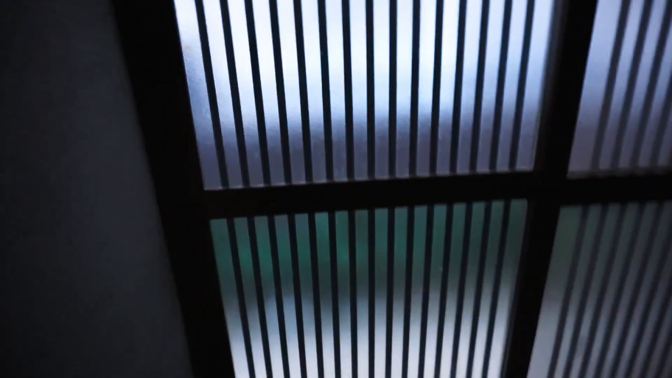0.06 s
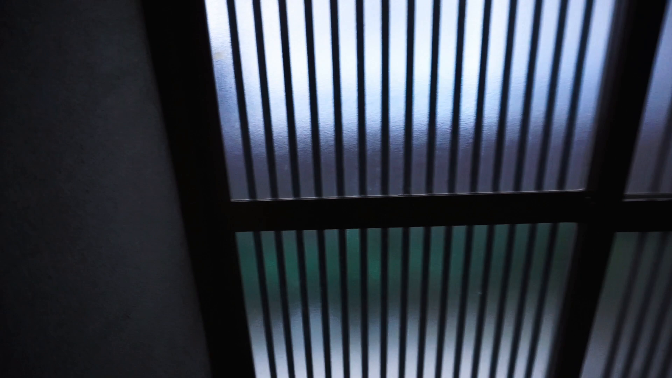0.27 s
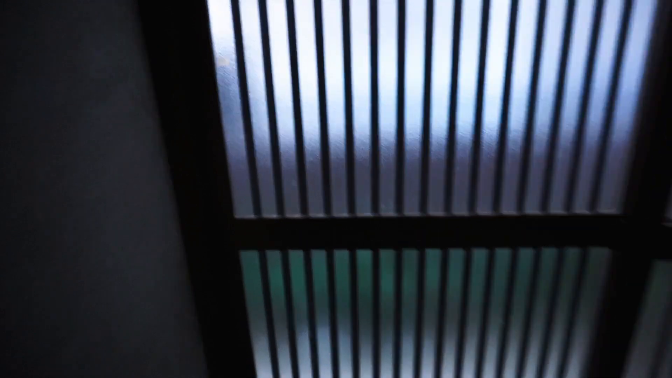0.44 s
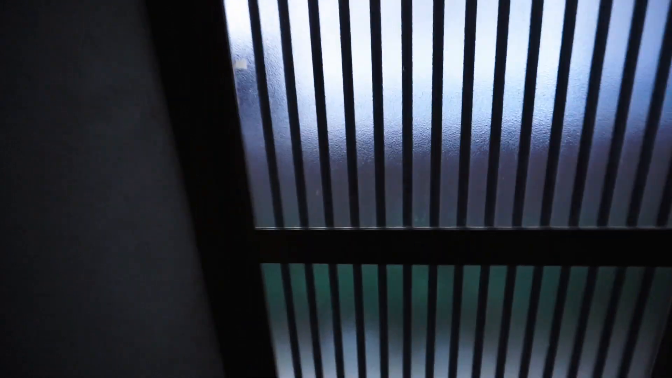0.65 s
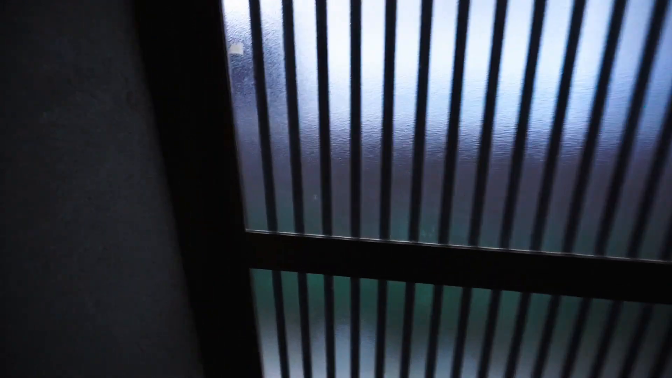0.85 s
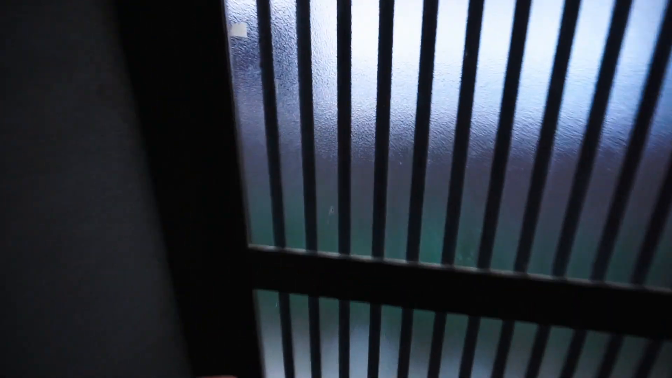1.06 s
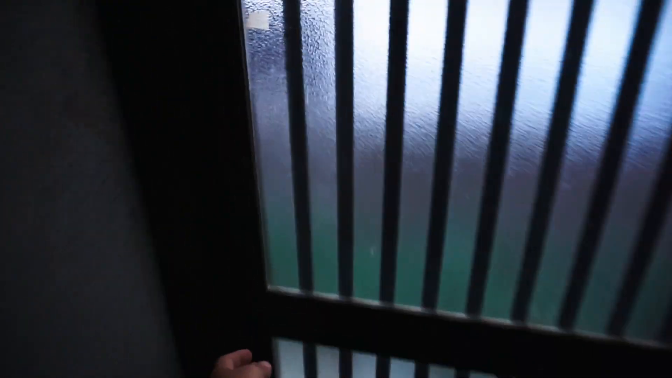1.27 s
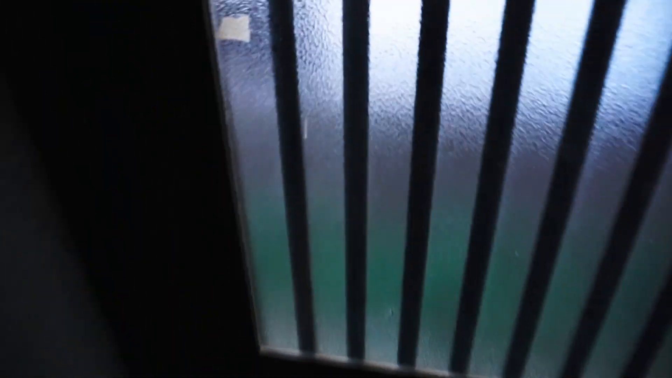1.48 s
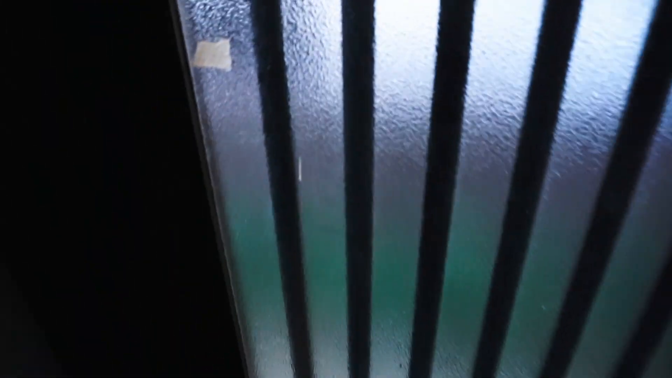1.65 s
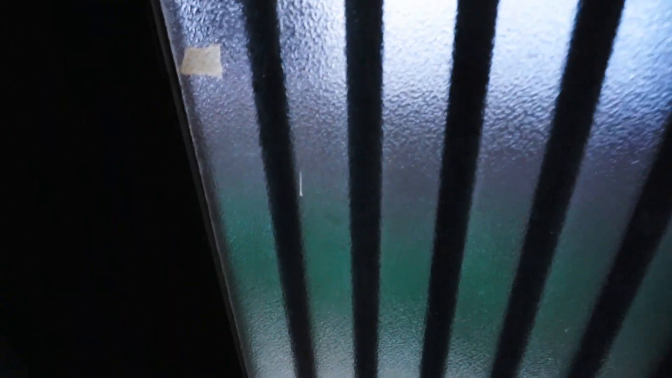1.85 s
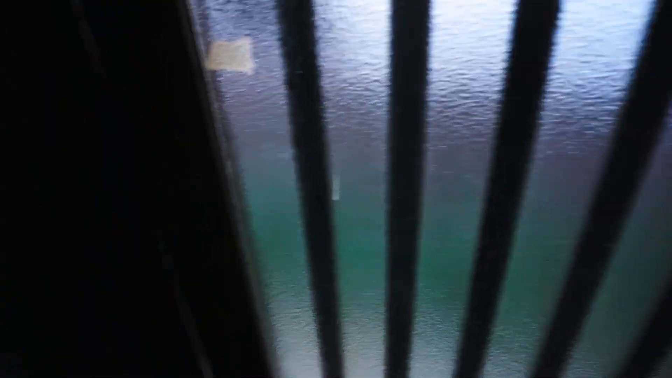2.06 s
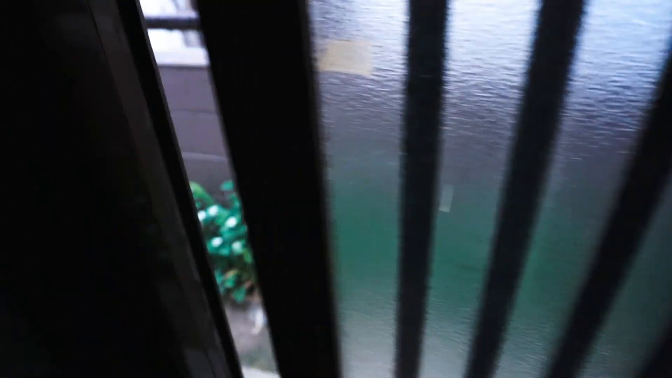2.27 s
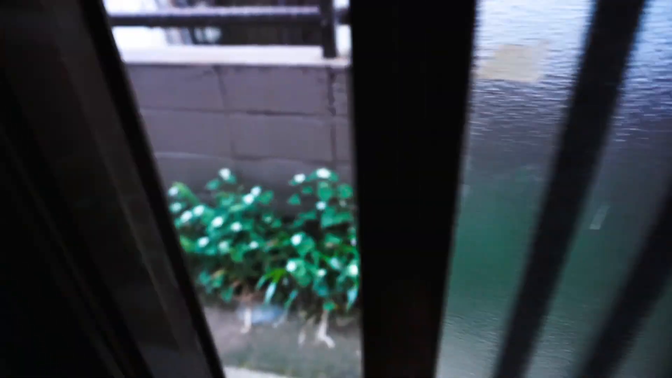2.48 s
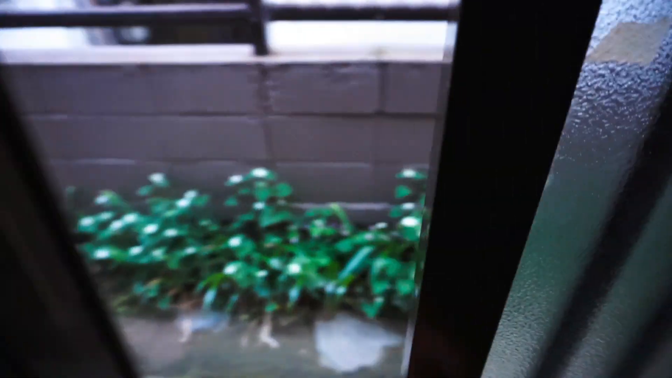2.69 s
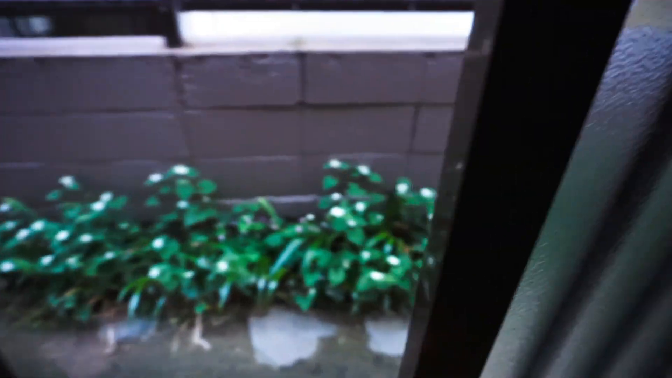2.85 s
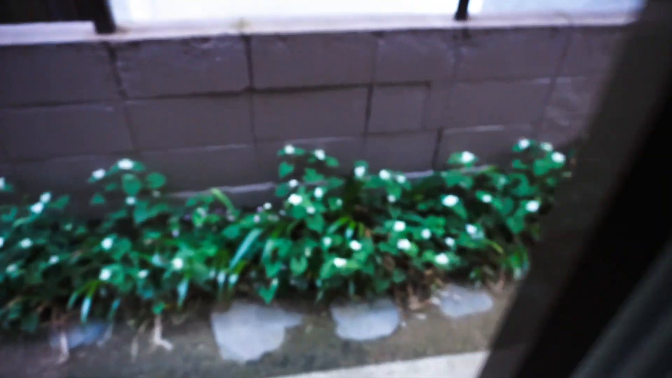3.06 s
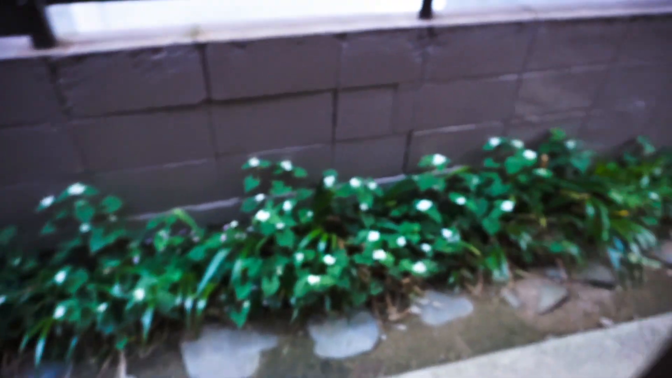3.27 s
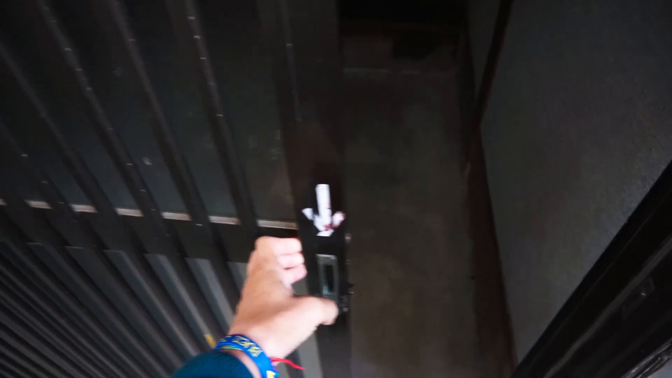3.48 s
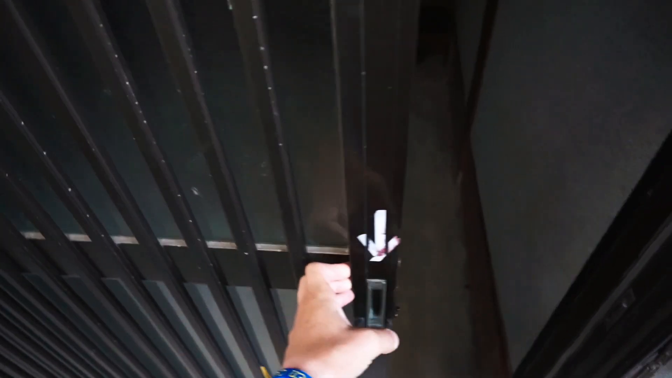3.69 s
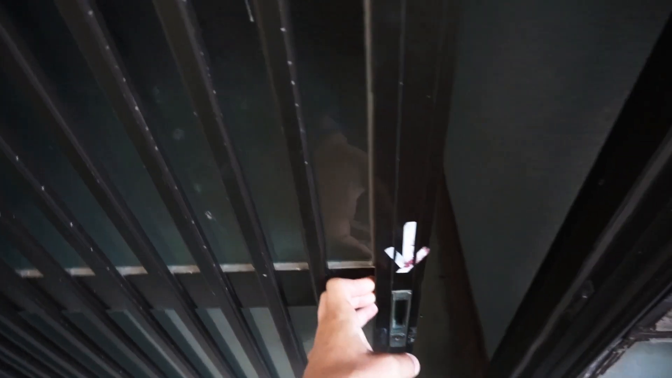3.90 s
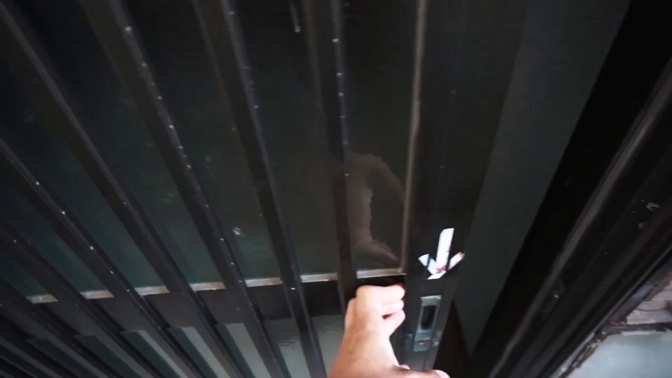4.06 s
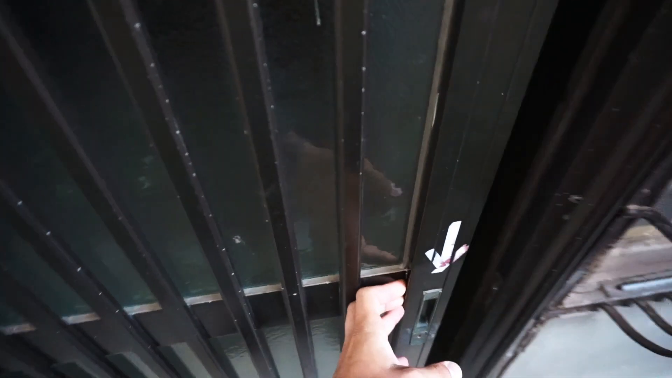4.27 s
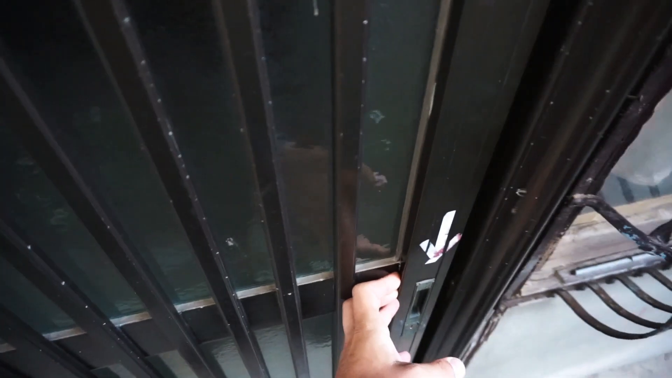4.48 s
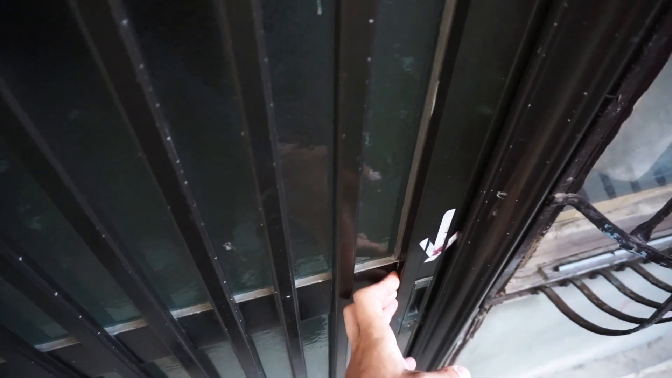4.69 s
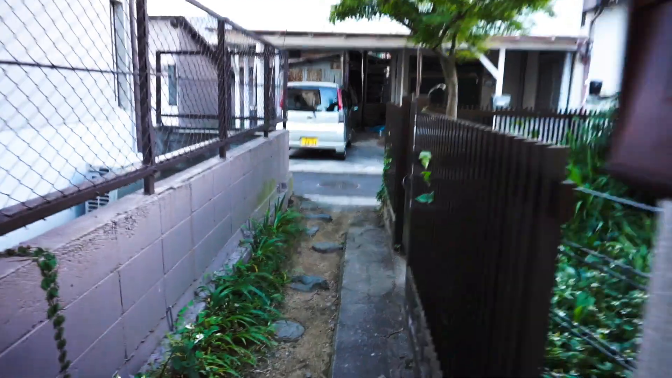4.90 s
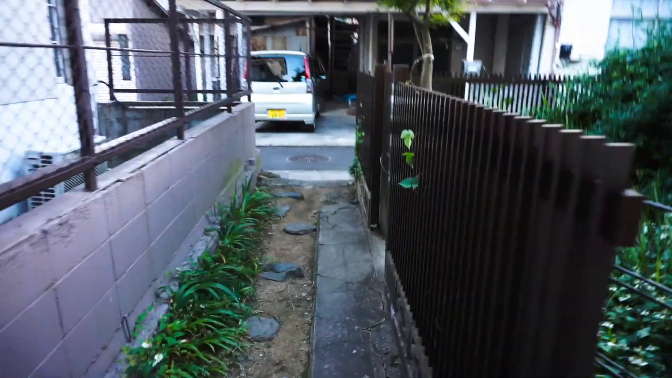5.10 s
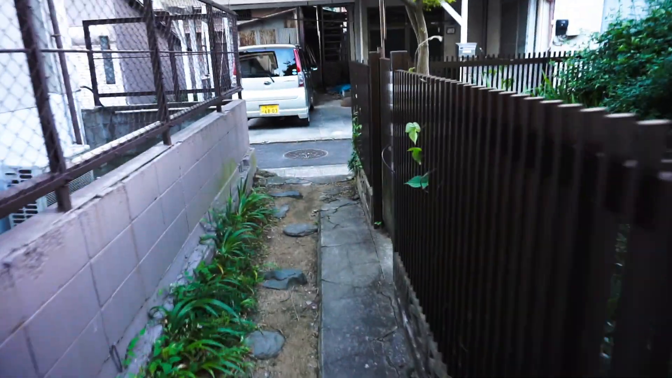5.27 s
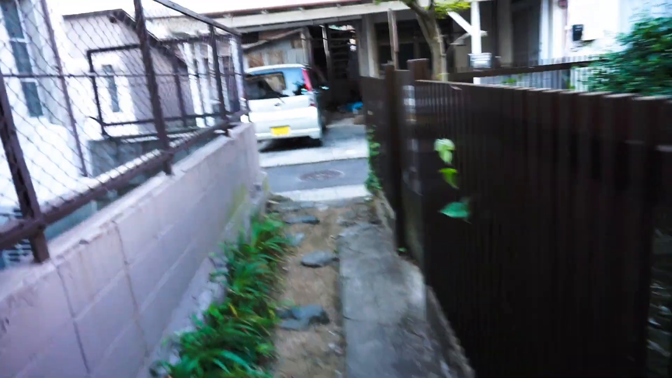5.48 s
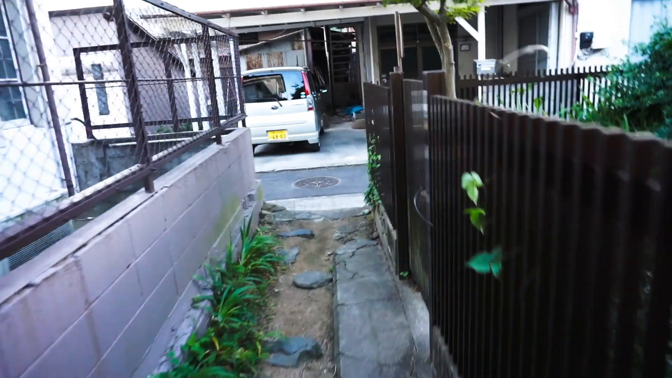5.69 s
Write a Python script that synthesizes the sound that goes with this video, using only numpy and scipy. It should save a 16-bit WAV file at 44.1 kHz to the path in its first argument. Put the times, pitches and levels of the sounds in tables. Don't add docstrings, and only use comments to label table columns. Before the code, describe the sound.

In a quiet entrance, small clicks and soft thumps lead to a rattling sliding door rolling open, then closing more drily with a bang at the post.

```python
import sys
import numpy as np
from scipy import signal
from scipy.fft import rfft, irfft, next_fast_len
from scipy.io import wavfile
from scipy.ndimage import uniform_filter1d, map_coordinates

SR = 44100
rng = np.random.default_rng(int(sys.argv[2]) if len(sys.argv) > 2 else 0)


def voltage_ratio(decibels):
    exponent = np.asarray(decibels, float) / 20
    return 10 ** exponent


def put_to_file(sound):
    columns = np.atleast_2d(sound).T
    safe = np.clip(columns, -1, 1)
    whole_steps = np.round(safe * 32767)
    wavfile.write(sys.argv[1], SR, whole_steps.astype(np.int16))


N = 253134
OUTSIDE_S = 3.46


def unit(x):
    return x / np.sqrt(np.mean(x ** 2) + 1e-20)


def along(points, hz):
    f, v = np.transpose(points)
    return np.interp(np.log(hz + 1), np.log(f + 1), v)


def colour(points):
    return lambda hz: voltage_ratio(along(points, hz))


def wobble(rate_hz):
    knots = rng.standard_normal(int(N * rate_hz / SR) + 4)
    return map_coordinates(knots, [np.arange(N) * rate_hz / SR])


def modes(table, hz, gains=None):
    centre, width, db = np.transpose(table)[:, :, None]
    gain = voltage_ratio(db) * (-1.) ** np.arange(len(table))[:, None]
    if gains is not None:
        gain = gain * gains[:, None]
    return np.sum(gain * 1j * hz * width / (centre ** 2 - hz ** 2 + 1j * hz * width), axis=0)


# f/Hz, likeness (0..1)
LIKENESS = [(100, 1), (350, 0.99), (700, 0.84), (1400, 0.39), (2800, 0.096), (5000, 0.0093), (10000, 0.023),
            (14000, 0.085)]


def stereo(pair, response, direct=0, lag_s=0):
    n = pair.shape[1]
    m = next_fast_len(n + 4096)
    hz = np.fft.rfftfreq(m, 1 / SR)
    likeness = direct + (1 - direct) * along(LIKENESS, hz)
    turn = np.arccos(np.clip(likeness, -1, 1)) / 2
    mid, side = rfft(pair, m) * response(hz) * [np.cos(turn), np.sin(turn)]
    shift = np.exp(1j * np.pi * hz * lag_s)
    return irfft(np.array([(mid + side) / shift, (mid - side) * shift]), m)[:, :n]


def rush(response, grain_db, patchy_db=0):
    noise = voltage_ratio(grain_db * (wobble(35) + 0.31 * wobble(220))) * rng.standard_normal((2, N))
    if patchy_db:
        z = signal.stft(noise, nperseg=256)[2]
        field = uniform_filter1d(rng.standard_normal(z.shape[1:]), size=3, axis=0)
        field = uniform_filter1d(field, size=6, axis=1)
        noise = signal.istft(z * voltage_ratio(patchy_db * unit(field)), nperseg=256)[1][:, :N]
    return unit(stereo(noise, response))


def burst(t60_s, rise_s, crack=0):
    t = np.arange(SR // 6) / SR
    chatter = voltage_ratio(-60 * t / t60_s) * (1 - np.exp(-t / rise_s))
    contact = voltage_ratio(-60 * t / 0.02) * (1 - np.exp(-t / .0001))
    return rng.standard_normal((2, len(t))) * (chatter + crack * contact)


def favour(table, ring_hz, lift_db, reach_oct, scatter_db):
    octaves = np.log2(np.array(table)[:, 0] / ring_hz)
    lift = lift_db * np.exp(-(octaves / reach_oct) ** 2)
    return voltage_ratio(lift + scatter_db * rng.standard_normal(len(table)))


def blow(pair, response):
    return stereo(pair, response, direct=0.89, lag_s=.00007 * rng.standard_normal())


def add(track, s, sound, peak_db, pan_db):
    i = round((s - .001) * SR)
    sound = sound[:, :track.shape[1] - i] / np.abs(sound.mean(axis=0)).max()
    track[:, i:i + sound.shape[1]] += sound * voltage_ratio([[peak_db + pan_db / 2], [peak_db - pan_db / 2]])


# f/Hz, level/dB per Hz
AIR = [(24, -46), (40, -47), (85, -43), (147, -7.5), (180, -15), (918, -6), (1090, -3.5), (1590, -2),
       (1760, -5), (2050, -6), (7360, -13.5), (12800, -11), (16000, -15.5)]


def air():
    return voltage_ratio(-55) * rush(colour(AIR), grain_db=0)


# f/Hz, t60/s
HALL = [(200, 0.38), (2000, 0.24), (10000, 0.18)]


def hall(x):
    hz, t, z = signal.stft(rng.standard_normal((2, SR // 3)), SR, nperseg=256)
    decay = voltage_ratio(-60 * t / along(HALL, hz)[:, None])
    tail = signal.istft(z * decay, SR, nperseg=256)[1]
    return signal.fftconvolve(x, tail / np.linalg.norm(tail[0]), axes=1)[:, :N]


def strokes(peak_s, rise_s, fall_s, db):
    power = np.zeros(N)
    for s, up, down, level in zip(peak_s, rise_s, fall_s, db):
        span = slice(max(int((s - up) * SR), 0), int((s + 5 * down) * SR))
        t = (np.arange(N) / SR)[span] - s
        swell = np.clip(1 + t / up, 0, 1) ** 1.3
        fade = voltage_ratio(level - 17 * np.clip(t / down, 0, None))
        power[span] += (fade * swell) ** 2
    return np.sqrt(power)


# peak t/s, rise/s, fall/s, level/dB, brightness/dB
RUBS = [(0.002, 0.0028, 0.04, -38.5, 3), (0.06, 0.049, 0.0094, -38.5, 1), (.46, 0.0057, 0.12, -48.5, 5.5),
        (.62, 0.049, 0.1, -44.5, 3.5), (.706, 0.0081, 0.079, -48, 4), (.83, 0.039, 0.078, -45, -2.5),
        (1.182, 0.023, 0.049, -53.5, 5.5), (1.227, 0.045, 0.13, -49, 0), (1.322, 0.02, 0.15, -44.5, -2),
        (1.41, 0.15, 0.11, -46, 5), (1.586, 0.0035, 0.095, -24, -3), (1.666, 0.09, 0.1, -29.5, 0),
        (1.744, 0.061, 0.078, -24, -3.5), (1.853, 0.043, 0.096, -43.5, -1.5),
        (1.99, 0.072, 0.84, -47, -2.5), (4.673, 0.0054, 0.055, -26.5, -2.5), (4.722, 0.027, 0.13, -23.5, 0),
        (4.843, 0.033, 0.0096, -29.5, -1.5), (4.93, 0.054, 0.14, -38.5, 3), (5.126, 0.019, 0.2, -51.5, -7),
        (5.4, 0.11, 0.24, -53, -8), (5.56, 0.061, 0.15, -48.5, -3), (5.686, 0.08, 0.064, -50.5, 0.5)]
# peak t/s, rise/s, fall/s, level/dB
TREADS = [(.032, 0.093, 0.091, -50.5), (.452, 0.0061, 0.21, -50), (.65, .08, 0.16, -51),
          (1.24, 0.017, 0.57, -51.5), (1.322, 0.012, 0.53, -49.5), (1.588, 0.0075, 0.11, -33.5),
          (1.748, 0.033, 0.1, -33.5), (1.87, .05, 0.36, -55), (4.67, 0.003, 0.095, -32.5),
          (4.707, 0.019, 0.14, -31.5), (4.802, 0.057, 0.038, -33.5), (4.877, 0.01, 0.21, -43),
          (5.122, 0.013, 0.58, -56.5), (5.498, 0.088, 0.24, -50.5), (5.686, 0.13, 0.11, -57)]
# f/Hz, level/dB per Hz
SOLE = [(94, -32), (160, -13.5), (392, -8.5), (579, -12.5), (623, -7.5), (900, -8.5), (1170, -12.5),
        (1980, -120)]
GROUND = [(15, -38), (25, -6), (92, -0.5), (128, -1.5), (163, -4.5), (241, 1), (628, -4.5), (900, -4.5),
          (1170, -3), (1980, -120)]
RUB = [(350, -14.5), (600, 1.5), (624, -7), (2450, 1), (2930, 1), (3910, 0.5), (6500, -5.5), (8450, -28),
       (14300, -120)]
CLOTH = [(2650, -65), (4500, -7), (5840, -6), (7470, -3.5), (13100, -1), (15700, -7)]
# f/Hz, width/Hz, level/dB
LATCH = [(1390, 48, -1.5), (1715, 33, 1), (2460, 110, -4), (3290, 76, -6), (3900, 220, -7), (4170, 32, -3)]
POST = [(980, 33, 0), (1980, 120, -10), (2520, 23, -2), (2740, 62, -8), (4070, 53, -4), (5830, 65, -13)]


def scuffs():
    s, up, down, db, bright_db = np.transpose(RUBS)
    indoors = np.arange(N) < OUTSIDE_S * SR

    def ringing(table, share):
        response = lambda hz: colour(RUB)(hz) * (1 + share * np.abs(modes(table, hz)))
        return rush(response, grain_db=1.5, patchy_db=2.5)

    rub = np.where(indoors, ringing(LATCH, share=2.2), ringing(POST, share=1.6))
    cloth = rush(colour(CLOTH), grain_db=2.0)
    sole = np.where(indoors, rush(colour(SOLE), grain_db=2), rush(colour(GROUND), grain_db=2.5))
    rubbing = strokes(s, up, down, db) * rub + strokes(s, up, down, db + bright_db) * cloth
    return strokes(*np.transpose(TREADS)) * sole + rubbing


def pushes(events, damping, rise_s, push=0):
    out = np.zeros((2, N))
    for s, db, ring_hz, t60_s in events:
        force = burst(t60_s, rise_s) + push * (np.arange(SR // 6) == 0)
        ring = lambda hz: modes([(ring_hz, damping * ring_hz, 0)], hz) ** 2
        add(out, s, stereo(force, ring), db, 0)
    return out


# t/s, peak level/dB, f/Hz, t60/s
BUMPS = [(0.003, -45, 185, 0.043), (0.454, -48, 730, 0.045), (0.454, -48, 197, 0.042),
         (1.234, -38, 290, 0.037), (1.234, -41, 162, 0.057), (1.321, -26.5, 318, 0.023),
         (1.324, -39, 159, 0.04), (1.349, -36.5, 160, 0.05), (1.619, -28.5, 355, 0.099),
         (2.102, -33, 770, 0.17), (4.666, -24.5, 630, 0.11), (4.869, -28.5, 215, 0.09),
         (4.762, -31.5, 260, 0.041), (4.788, -37, 300, 0.059), (4.838, -26.5, 620, 0.039),
         (4.715, -29, 980, .05), (4.973, -37, 231, 0.14), (5.12, -41, 566, 0.27),
         (5.492, -36.5, 139, 0.042), (5.495, -38, 378, .04)]


def bumps():
    return pushes(BUMPS, damping=0.52, rise_s=0.0019, push=10.2)


# t/s, peak level/dB, f/Hz, t60/s
PINGS = [
    (0.0034, -30.5, 3450, 0.03),
    (0.047, -36, 2500, .015),
    (0.049, -37, 3300, 0.014),
    (0.18, -49, 3270, 0.016),
    (0.8438, -34.5, 3900, 0.016),
]


def pings():
    return pushes(PINGS, damping=0.067, rise_s=.002)


# f/Hz, width/Hz, level/dB
KEY_MODES = [(8630, 130, 14.5), (9620, 45, 17.5), (9800, 45, 13), (9900, 55, 14), (11850, 150, -5),
             (12750, 94, 17), (14000, 250, 5), (14500, 50, -1), (15570, 140, 17)]


def keys(events, t60_s, rise_s, lift_db, broad_db, width_hz):
    out = np.zeros((2, N))
    for s, db, ring_hz, pan_db in events:
        gains = favour(KEY_MODES, ring_hz, lift_db, reach_oct=.1, scatter_db=2)
        click = lambda hz: voltage_ratio(broad_db) * modes([(ring_hz, width_hz, 0)], hz) ** 2
        ring = lambda hz: modes(KEY_MODES, hz, gains) + click(hz)
        add(out, s, blow(burst(t60_s, rise_s), ring), db, pan_db)
    return out


# t/s, peak level/dB, loudest f/Hz, left-right/dB
JINGLES = [
    (3.574, -33, 12750, 0),
    (3.592, -19, 9750, 3),
    (3.598, -15.5, 9100, 2),
    (3.603, -17, 9800, -3),
    (3.612, -30, 9650, 0),
    (3.622, -31, 9800, -2),
    (3.649, -31, 9700, -2),
    (4.715, -20, 14000, 5),
    (4.725, -15, 14500, 12),
    (4.7494, -14, 14500, 4),
]
# t/s, peak level/dB, loudest f/Hz, left-right/dB
CLINKS = [(3.4787, -24, 9600, 5.6), (3.5155, -20.5, 8960, 0.88), (3.525, -19.5, 10100, 2),
          (3.587, -18.5, 10800, 3), (3.8286, -34, 9560, 5), (3.8726, -29, 12800, 5),
          (3.9015, -27, 14800, 5), (3.9444, -28, 13500, 4), (4.0436, -18.5, 14800, 3.0),
          (4.312, -20.5, 13600, 2.73), (4.4852, -30, 13000, 4.3)]


def key_bunch():
    ringing = keys(JINGLES, t60_s=0.037, rise_s=.0015, lift_db=18.5, broad_db=21.5, width_hz=1400)
    clicking = keys(CLINKS, t60_s=.04, rise_s=.0006, lift_db=3, broad_db=22, width_hz=6000)
    return ringing + clicking


# t/s, peak level/dB, tick level/dB, loudest f/Hz, left-right/dB
KNOCKS = [(0.066, -25, -3, 2880, 3), (1.32, -41, -26, 1100, -14), (1.587, -15, -7.5, 1077, 0),
          (1.591, -22.5, 0.5, 1280, 2), (1.85, -34.5, 0, 2560, 6), (1.869, -32.5, -4, 970, 1),
          (1.882, -38, -3, 751, 6), (4.648, -37, -12, 1250, 0), (4.6655, -16, -11.5, 3300, -4),
          (4.668, -11.5, -21, 2650, -6), (4.670, -18, -20, 1170, -6), (4.675, -29, -13, 2500, 4),
          (4.829, -22, -15, 3400, 4), (4.709, -14.5, -24, 3330, -5), (4.721, -24, -5, 990, -3),
          (4.789, -23.5, -16, 1900, -7), (5.088, -39, 0.5, 3780, 3), (5.244, -40.5, -13, 2400, 7)]
# f/Hz, width/Hz, level/dB
PANES = [(1003, 12.5, 5.5), (1160, 140, 5), (1470, 230, 2.5), (1810, 96, 5), (2070, 250, -3.5),
         (2270, 21, 7.5), (2470, 130, -7), (2620, 80, 7), (3300, 450, -3), (3580, 29, 9.5), (3910, 270, 0),
         (4410, 36, 6.5)]
# f/Hz, level/dB
TICK = [(3000, -4), (5000, -3.5), (8000, 3.5), (12000, -0.5), (16000, -3)]


def knocks():
    out = np.zeros((2, N))
    crack = 2.4
    for s, db, tick_db, ring_hz, pan_db in KNOCKS:
        gains = favour(PANES, ring_hz, lift_db=6, reach_oct=.12, scatter_db=3)
        struck = lambda hz: 1 + 1.8 * np.abs(modes([(ring_hz, 0.21 * ring_hz, 0)], hz))
        body = lambda hz: modes(PANES, hz, gains) * (hz < 5000) + voltage_ratio(2.5 + along(RUB, hz))
        ring = lambda hz: struck(hz) * body(hz)
        add(out, s, blow(burst(0.027, 0.0015, crack), ring), db, pan_db)
        add(out, s, blow(burst(0.011, 0.0006, 0.5 * crack), colour(TICK)), db + tick_db + 9, pan_db)
    return out


# t/s, length/s, first f/Hz, last f/Hz, level/dB
SQUEAKS = [
    (2.66, .24, 10750, 11905, -64),
    (2.72, .18, 13030, 13450, -61),
    (4.12, .1, 11750, 11685, -62),
    (4.21, .1, 11685, 12374, -61),
    (4.32, .17, 12000, 9400, -62),
    (4.99, .11, 9500, 9400, -68),
    (5.13, .06, 8300, 8750, -69),
    (5.28, .09, 11500, 11300, -72),
]


def squeaks():
    out, t = np.zeros(N), np.arange(N) / SR
    for s, length_s, first_hz, last_hz, db in SQUEAKS:
        u = (t - s) / length_s
        glide_hz = first_hz + (last_hz - first_hz) * np.clip(u, 0, 1)
        pitch_hz = glide_hz * (1 + 0.007 * wobble(200))
        gain = voltage_ratio(db - 4 * u + 10 + 4 * wobble(50)) * (u > 0) * (u < 1)
        out += gain * np.sin(2 * np.pi * np.cumsum(pitch_hz) / SR)
    return out * voltage_ratio([[1.5], [-1.5]])


# t/s, left-right/dB
DOOR_SIDE = [(2.0, 3), (3.31, -5), (3.62, 1), (4.48, 1), (4.6, 6)]


def door_pan_db(s):
    return np.interp(s, *np.transpose(DOOR_SIDE))


# t/s, peak level/dB, loudest f/Hz, t60/s
TICKS = [(1.894, -36, 8020, 0.046), (2.068, -20.5, 9340, 0.05), (2.0734, -32, 9400, 0.08),
         (2.171, -28.5, 12500, 0.05), (2.2184, -31, 5240, 0.05), (2.2553, -27.5, 5980, 0.05),
         (2.3467, -20, 6490, 0.05), (2.4249, -27.5, 6780, 0.054), (2.4716, -21, 7090, 0.081),
         (2.5354, -27, 5520, 0.05), (2.5737, -13.5, 8140, 0.073), (2.6144, -28, 5670, 0.05),
         (2.6954, -26, 5270, 0.05), (2.733, -27, 11100, 0.054), (2.818, -18, 5650, 0.058),
         (2.8874, -27, 5790, 0.05), (2.9394, -22, 5590, 0.05), (3.0257, -19, 5700, 0.11),
         (3.0614, -23, 12600, 0.05), (3.101, -22, 5140, 0.085), (3.1487, -24, 5330, 0.062),
         (3.2415, -27, 5070, 0.05), (3.2925, -35, 5100, 0.05), (3.4114, -41, 12500, 0.05),
         (3.664, -27, 9790, 0.05), (3.714, -27, 8360, 0.05), (4.0694, -28, 5470, 0.054),
         (4.095, -26, 5350, 0.055), (4.1714, -30, 11500, 0.05), (4.2324, -32, 13400, 0.05),
         (4.2911, -32, 14100, 0.046), (4.3574, -32, 5630, 0.05), (4.433, -29, 13000, 0.05),
         (4.5295, -27.5, 5230, 0.06)]


def ticks():
    out = np.zeros((2, N))
    for s, db, ring_hz, t60_s in TICKS:
        struck = lambda hz: 1 + 1.8 * np.abs(modes([(ring_hz, 0.081 * ring_hz, 0)], hz))
        ring = lambda hz: colour(TICK)(hz) * struck(hz)
        add(out, s, blow(burst(t60_s, 0.00091, crack=0.4), ring), db - 2.5, door_pan_db(s))
    return out


# f/Hz, level/dB
CLACK = [(500, -38), (900, 4.5), (1500, -12), (2500, 1), (4200, -0.5), (5200, 0.5), (8000, -14.5)]


def rattles(events, broad_db, focus, crack, rise_s):
    out = np.zeros((2, N))
    for s, db, low_hz, high_hz, t60_s in events:
        gains = favour(PANES, low_hz, lift_db=3, reach_oct=.1, scatter_db=3)
        pieces = [(low_hz, 0.086 * low_hz, 0), (high_hz, 0.12 * high_hz, 0)]
        struck = lambda hz: 1 + focus * np.abs(modes(pieces, hz))
        body = lambda hz: modes(PANES, hz, gains) * (hz < 5000) + voltage_ratio(broad_db + along(CLACK, hz))
        ring = lambda hz: struck(hz) * body(hz)
        add(out, s, blow(burst(t60_s, rise_s, crack), ring), db - 2, door_pan_db(s))
    return out


# t/s, peak level/dB, low f/Hz, high f/Hz, t60/s
OPENING = [(1.99, -36, 1950, 2360, 0.056), (2.0662, -17.5, 1980, 2590, 0.05),
           (2.0727, -20, 2070, 2070, 0.07), (2.1721, -15, 1920, 2540, 0.064),
           (2.2172, -17.5, 1580, 2290, 0.043), (2.2564, -19.5, 1660, 2400, 0.05),
           (2.278, -14, 1140, 1980, 0.033), (2.2848, -22.5, 1350, 2210, 0.056),
           (2.3441, -13, 1600, 2380, 0.033), (2.3514, -11.5, 1900, 2470, 0.036),
           (2.4242, -19.5, 1900, 2450, 0.05), (2.473, -9.5, 1750, 2440, 0.04),
           (2.517, -16.5, 1160, 2470, 0.044), (2.5347, -13.5, 1470, 2350, 0.13),
           (2.577, -8, 2015, 2110, 0.097), (2.6155, -14, 1180, 2200, 0.063),
           (2.6774, -20, 1720, 2390, 0.05), (2.6936, -15, 1470, 2520, 0.075),
           (2.734, -15, 1470, 2440, 0.05), (2.7605, -22, 1640, 2080, 0.034),
           (2.806, -18, 1540, 2300, 0.081), (2.819, -10.5, 1780, 2760, 0.047),
           (2.8878, -30, 1510, 2120, 0.044), (2.9074, -19.5, 1830, 2280, 0.045),
           (2.9294, -20, 1660, 1970, 0.05), (2.9416, -13.5, 1730, 2030, 0.039),
           (3.0261, -12.5, 1800, 2600, 0.066), (3.0617, -14, 1860, 2220, 0.059),
           (3.1023, -18.5, 1870, 2300, 0.05), (3.1148, -15.5, 1500, 2240, 0.082),
           (3.148, -13, 1730, 2250, 0.11), (3.241, -17, 1500, 2100, 0.11), (3.294, -20, 1750, 2090, 0.05),
           (3.3555, -26, 1610, 2450, 0.05), (3.4121, -19.5, 1710, 2170, 0.072)]
SHUTTING = [(3.4827, -15.5, 1860, 2230, 0.094), (3.5997, -19, 1740, 2160, 0.062),
            (3.6204, -20, 1340, 1930, 0.067), (3.663, -20.5, 1530, 1980, 0.058),
            (3.712, -20, 1120, 3970, 0.066), (3.7654, -20.5, 1010, 1850, 0.05),
            (3.837, -21, 1670, 2370, 0.05), (3.8695, -22, 1070, 3240, 0.054),
            (3.8899, -18, 1020, 2060, 0.12), (4.0213, -21.5, 1150, 4340, 0.038),
            (4.0705, -21.5, 1010, 4100, 0.077), (4.0971, -13.5, 1280, 2400, 0.059),
            (4.1237, -19.5, 1830, 2500, 0.05), (4.1714, -22, 1140, 3800, 0.061),
            (4.2324, -18, 1130, 2260, 0.061), (4.2905, -15.5, 1140, 2060, 0.056),
            (4.359, -21.5, 1170, 2150, 0.041), (4.4043, -36, 1250, 4050, 0.059),
            (4.4318, -23.5, 1280, 2150, 0.042), (4.5289, -17.5, 1155, 2550, 0.062)]


def pane_rattle():
    opening = rattles(OPENING, broad_db=-1.0, focus=4.8, crack=0.47, rise_s=0.0034)
    return opening + rattles(SHUTTING, broad_db=-3, focus=4.5, crack=.6, rise_s=0.0015)


def jitters(centre_hz, spread, cycles, size_db, rate_hz=220):
    draws = rng.random((round(rate_hz * N / SR), 4))
    when, pitch, size, side = draws.T[:, :, None]
    k = np.arange(SR // 40)
    t = k / SR
    hz = centre_hz * np.exp(spread * (2 * pitch - 1))
    decay = voltage_ratio(-size_db * np.log(size) - 60 * t * hz / cycles)
    ring = decay * np.sin(2 * np.pi * hz * t) * (1 - np.exp(-t / 0.0018))
    at = (when * N).astype(int) + k + 8
    lag = (12 * side - 6).astype(int)
    return unit(np.array([np.bincount((at + way * lag).ravel(), ring.ravel(), N)[:N] for way in (0, 1)]))


# t/s, level/dB
SPEED = [(2.056, -75), (2.3, -36.5), (2.43, -30.5), (2.63, -26), (2.85, -25.5), (2.95, -25), (3.15, -25),
         (3.22, -32.5), (3.43, -36.5), (4.18, -37.5), (4.49, -50.5), (4.667, -60)]
# level/dB at reference drive, dB per dB of drive, dB per s from the open end
BOOM = (-32, 0.85, 0)
CHATTER = (-35.5, 0.47, 2.94)
SIZZLE = (-40, 0.27, 0.65)
RUMBLE = (-48.5, 0.56, 10.3)
# f/Hz, width/Hz, level/dB
PANEL = [(299, 25, -5), (344.2, 10, 6), (375.4, 14.5, -1), (386.1, 12.4, -1), (451.6, 30, -0.5),
         (542, 32, -2.5), (727, 95, -4)]
PANEL_OUTSIDE = [(289.6, 17, -4), (355, 69, 2.5), (410, 34, 1.5), (450, 35, 0.5), (524, 44, -1.5),
                 (730, 510, -11)]
# f/Hz, level/dB per Hz
GRIT = [(350, -8.5), (600, -2), (899, -0.5), (1110, -6), (1600, -4), (2200, -4.5), (3000, -7), (4000, -12),
        (6000, -7), (7800, -13.5), (13200, -120)]
HISS = [(2650, -19), (4500, 6.5), (4900, -13), (7650, -2.5), (14200, 1), (15300, -1.5), (16000, -30)]
THUD = [(15, -54), (25, -32), (97, -5), (123, 1.5), (161, -3), (188, 4.5), (227, -3), (260, -2.5),
        (340, -1), (570, -120)]


def rolling():
    t = np.arange(N) / SR
    drive_db = np.interp(t, *np.transpose(SPEED), -400, -400) + 30
    from_open_s = np.abs(t - OUTSIDE_S)

    def follow(layer):
        db, db_per_db, db_per_s = layer
        return voltage_ratio(db + db_per_db * drive_db + db_per_s * from_open_s)

    inside = rush(lambda hz: modes(PANEL, hz) * modes([(355, 212, 0)], hz) ** 2, grain_db=-3.0)
    outside = rush(lambda hz: modes(PANEL_OUTSIDE, hz) * modes([(418, 1700, 0)], hz), grain_db=0.0)
    panel = np.where(np.arange(N) < OUTSIDE_S * SR, inside, outside)
    power = np.abs(uniform_filter1d(np.mean(panel ** 2, axis=0), size=SR // 12))
    panel = panel / (power + .05) ** .3

    glass_ring = lambda hz: colour(GRIT)(hz) * (1 + 1.04 * np.abs(modes(PANES, hz)))
    glass = rush(glass_ring, grain_db=2.2, patchy_db=2.5)
    glass = glass + .4 * jitters(centre_hz=1900, spread=.6, cycles=45, size_db=2)
    hiss = rush(colour(HISS), grain_db=0.0)
    low = rush(colour(THUD), grain_db=2)
    return follow(BOOM) * panel + follow(CHATTER) * glass + follow(SIZZLE) * hiss + follow(RUMBLE) * low


def scene():
    hits = pane_rattle() + ticks() + knocks() + key_bunch() + bumps()
    near = pings() + squeaks()
    return hits + voltage_ratio(-10) * hall(hits) + rolling() + scuffs() + near + air()


def band_limit(x):
    return signal.sosfilt(signal.butter(12, 17000, fs=SR, output="sos"), x)


def record(dry):
    m = next_fast_len(N)
    hz = np.fft.rfftfreq(m, 1 / SR)
    treble = np.where(hz < 15850, 1, voltage_ratio(-33))
    bass = hz ** 2 / (hz ** 2 + 40 ** 2)
    mix = irfft(rfft(dry, m) * treble * bass, m)[:, :N]
    return band_limit(mix)


dry = scene()
out = record(dry)
put_to_file(out)
```